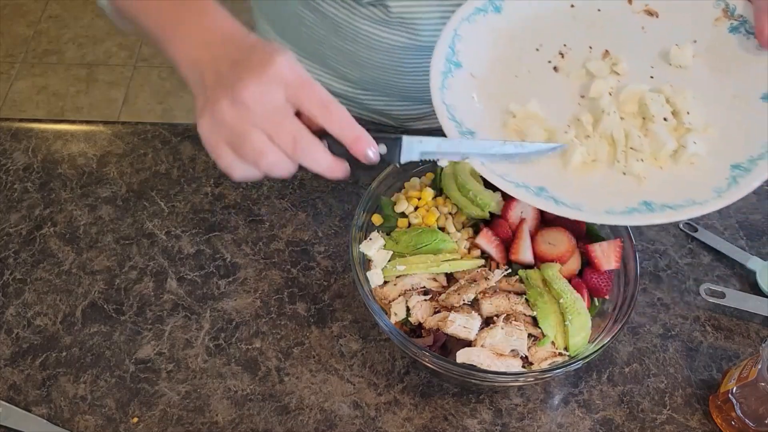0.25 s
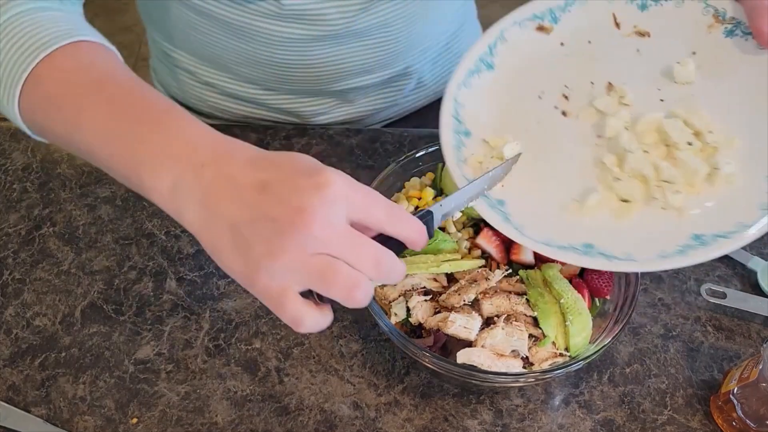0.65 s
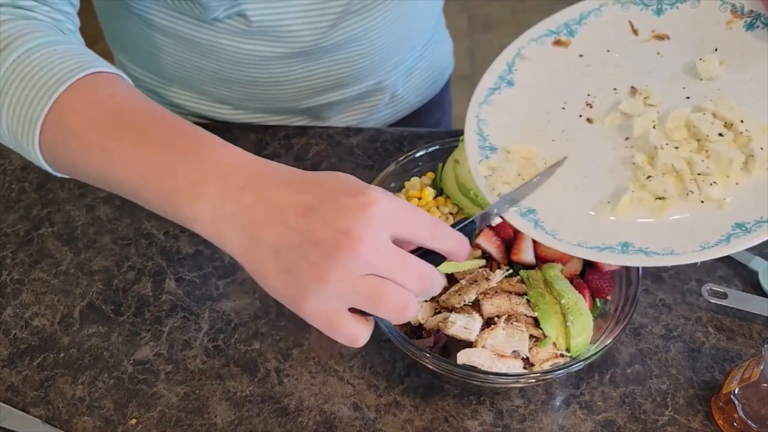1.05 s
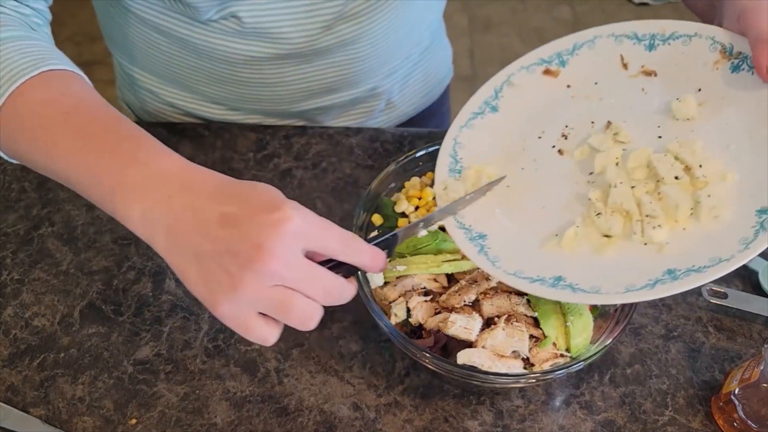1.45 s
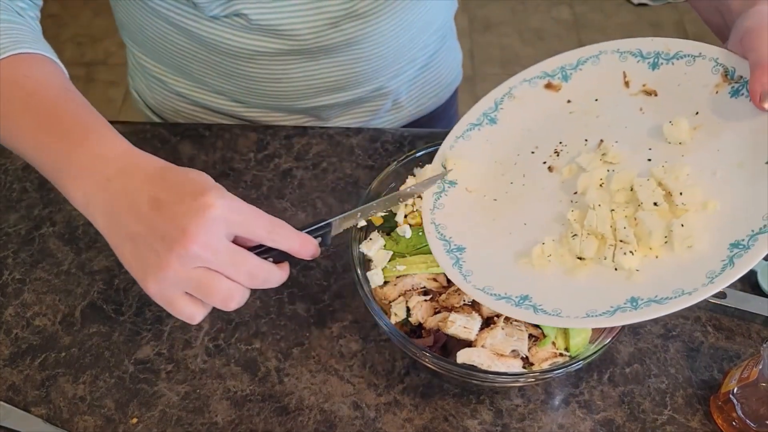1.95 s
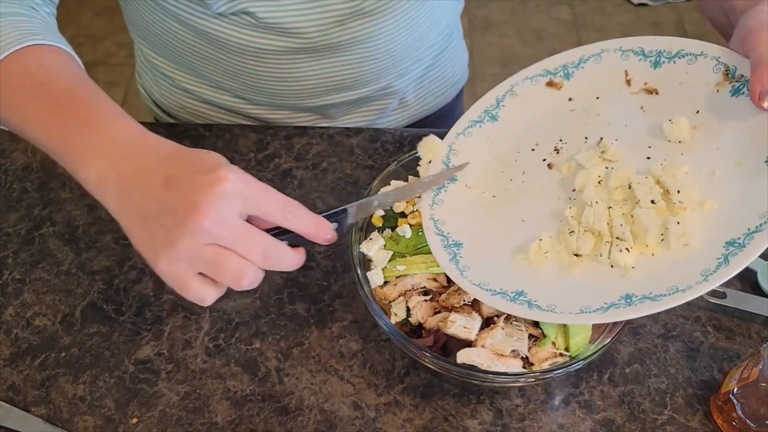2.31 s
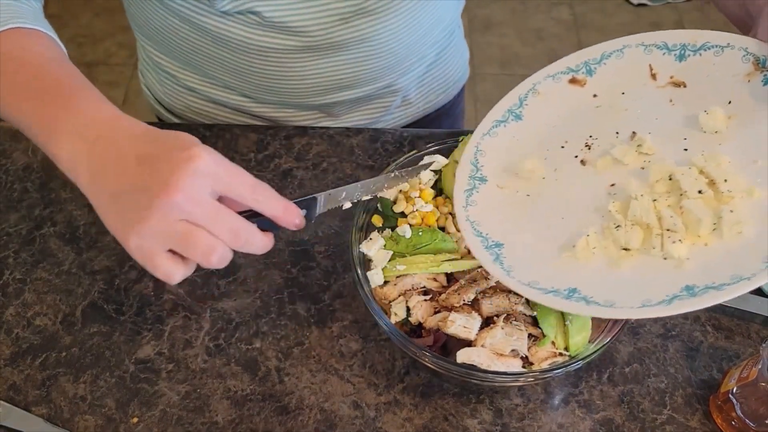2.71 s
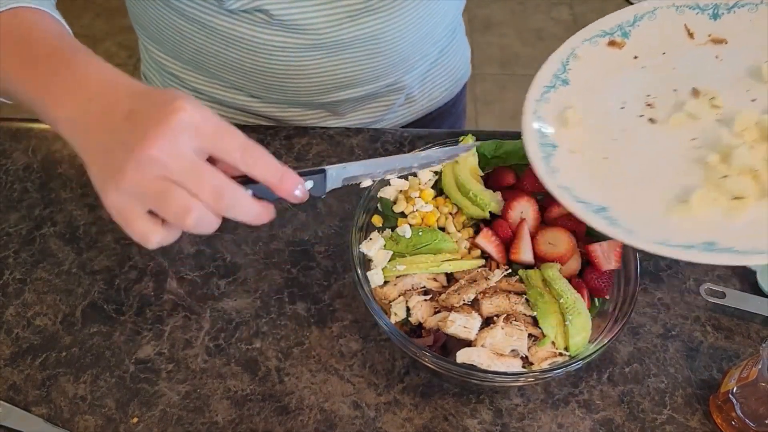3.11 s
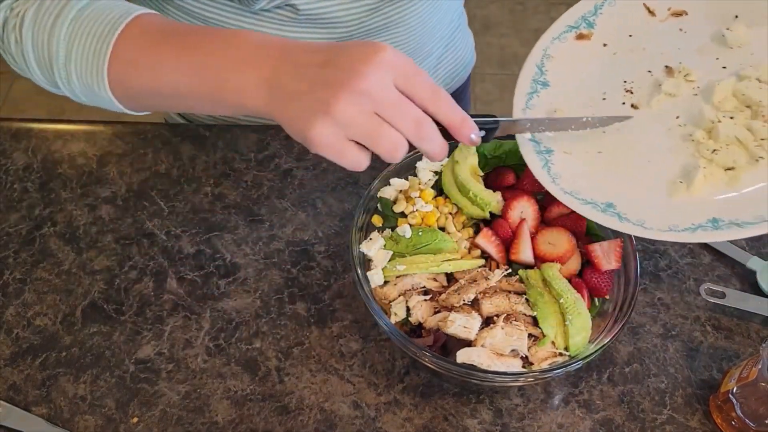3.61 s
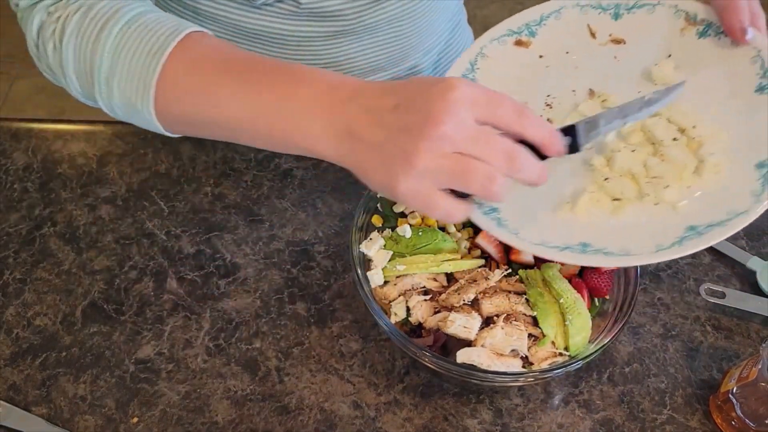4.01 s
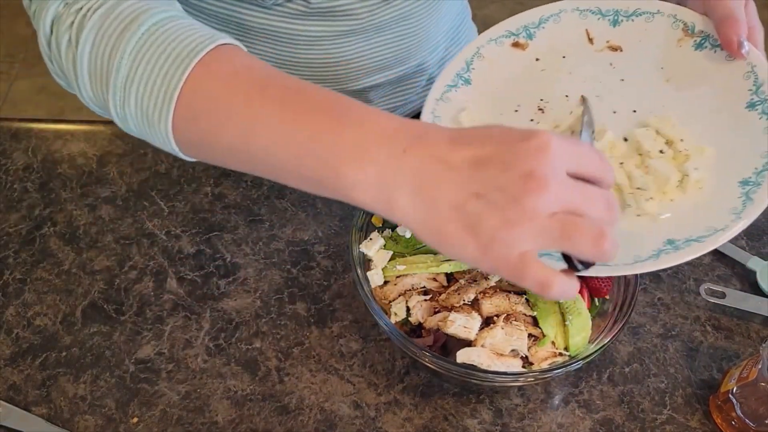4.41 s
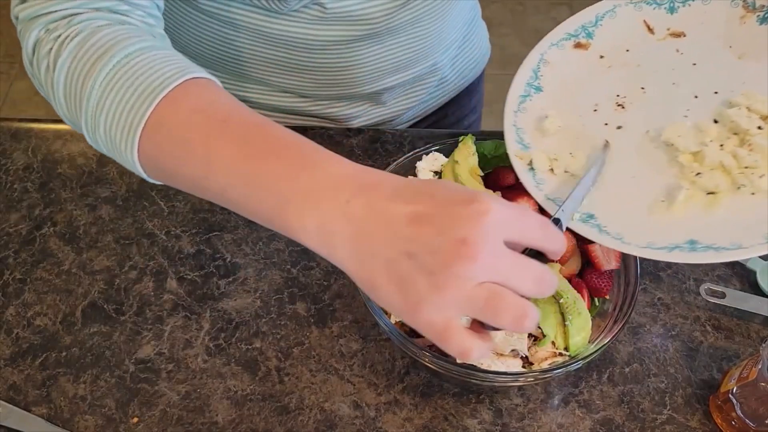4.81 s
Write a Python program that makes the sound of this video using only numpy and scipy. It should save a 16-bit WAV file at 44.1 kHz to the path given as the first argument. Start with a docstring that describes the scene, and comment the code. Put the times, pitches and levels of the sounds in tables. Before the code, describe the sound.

A knife clinks sharply on a ceramic plate, with short scrapes and a juddering run of snags, in a small kitchen over faint refrigerator hum.

```python
"""In a small, hard-walled kitchen, a table knife pushes crumbled cheese off a hand-held plate into a salad bowl.
The blade clinks on the ceramic, drags in tiny slips, snags and judders, and rings alone when it springs free:
each contact is a noise crack, a wash of overtones and decaying modes. Moist cheese squeaks as wavering sines,
crumbs drop as damped sines, a refrigerator hums in sines over filtered noise, and a noise tail is the room."""
import sys
import numpy as np
from scipy import signal
from scipy.fft import rfft, irfft, next_fast_len
from scipy.io import wavfile
from scipy.ndimage import uniform_filter1d

SR = 44100
rng = np.random.default_rng(int(sys.argv[2]) if len(sys.argv) > 2 else 0)


def transcribe(u):
    """Save the signal u as a 16-bit wav file named by the first command-line argument.

    u: samples, shape (n,) or (channels, n), limited to [-1, 1]; the rate is SR.
    q: integer samples, one column per channel.
    """
    v = np.clip(np.atleast_2d(u).T, -1, 1)
    q = np.round(v * 32767).astype(np.int16)
    wavfile.write(sys.argv[1], SR, q)


N = 222837
TIME = np.arange(N) / SR
RING = TIME[:SR // 3]  # time axis of one contact


def undb(db):
    """Decibels to gain."""
    return 10 ** (np.asarray(db) / 20)


def unit(x):
    """Scale to rms 1."""
    return x / np.sqrt(np.mean(x ** 2))


def on_log(hz, points):
    """Read (frequency [Hz], value) points on a log-frequency axis."""
    f, value = np.transpose(points)
    return np.interp(np.log(np.maximum(hz, 1)), np.log(f), value)


def colour(x, points):
    """Causal filter with the given (frequency [Hz], level [dB]) response, built from its cepstrum."""
    size = next_fast_len(x.shape[-1] + 4096, real=True)
    size += size % 2
    bins = np.arange(size // 2 + 1) * SR / size
    cepstrum = irfft(np.log(undb(on_log(bins, points))))
    # fold the cepstrum forward: minimum phase
    cepstrum[1:size // 2] *= 2
    cepstrum[size // 2 + 1:] = 0
    response = np.exp(rfft(cepstrum))
    return irfft(rfft(x, size) * response)[..., :x.shape[-1]]


def fade(t, t60):
    """Exponential decay, 60 dB down at t60."""
    return np.exp(-np.log(1000) * t / t60)


def pan(db):
    """Left and right gains for a level difference, left minus right."""
    return undb([[db / 2], [-db / 2]])


def add(out, s, x):
    """Mix x into out from time s."""
    i = int(s * SR)
    out[:, i:i + x.shape[-1]] += x[:, :N - i]


def walk(rate):
    """Slow random wandering with rms 1; rate is new values per second."""
    k = int(SR / rate)
    steps = np.repeat(rng.standard_normal(N // k + 1), k)
    return unit(uniform_filter1d(steps, k)[:N])


# refrigerator lines: (frequency [Hz], rms level before wavering [dB])
REFRIGERATOR_LINES = [(60, -71.5), (83, -67), (119.8, -66), (306.8, -74.5), (2966, -90), (3677, -93),
                      (6896, -103)]
# spectrum of the moving air: (frequency [Hz], relative level per Hz [dB])
AIR_SPECTRUM = [(15, -56), (25, -24), (43, -15.5), (123, -3), (145, -9), (242, -15), (270, -15.5),
                (301, -13.5), (326, -8.5), (575, -21), (677, -21), (2550, -43.5), (3080, -42.5),
                (3920, -48.5), (16000, -57.5)]
AIR_DB = -63
# the compressor's high lines wander more than its hum
WHINE_ABOVE_HZ, WHINE_DRIFT = 1000, 0.0046


def refrigerator(waver_db=3.35, drift=0.0012, pan_db=-2):
    """Mains hum and a thin, rough compressor whine over moving air; the bass is alike on both sides."""
    hum = np.zeros(N)
    for hz, db in REFRIGERATOR_LINES:
        line_drift = WHINE_DRIFT if hz > WHINE_ABOVE_HZ else drift
        level = np.sqrt(2) * undb(db + waver_db * walk(7.8))
        pitch = hz * (1 + line_drift * walk(120))
        hum += level * np.sin(2 * np.pi * np.cumsum(pitch) / SR)
    mid, side = unit(colour(rng.standard_normal((2, N)), AIR_SPECTRUM))
    side = colour(side, [(30, -7.5), (80, -9.5), (300, -4.0), (1000, 3)])
    air = undb(AIR_DB + .5 * walk(3.5)) * (mid + side * np.array([[1], [-1]]))
    return pan(pan_db) * (hum + air)


# spectrum of the contact crack, also tinting the wash: (frequency [Hz], level per Hz [dB])
CRACK_SPECTRUM = [(150, -34.5), (350, -3.5), (700, -0.5), (950, -4.5), (1400, -3.5), (1650, -7.5),
                  (2000, 0), (3200, 1.5), (3800, -3), (4600, -1), (8000, -2.5), (11000, -6), (14500, -7),
                  (16000, -19.5)]


def contact(modes, body_db, treble_db, spots=(), middle_db=0, crack_db=-1, crack_t60=0.019, dense_db=-2,
            dense_t60=0.13, cluster_hz=110, valley_db=-6, rise_s=0.0011, spread_s=.00016, split=.008):
    """One contact in stereo: a broad crack, clusters of short overtones and the clear modes."""
    hz, rest_db, t60 = np.transpose(modes)[:, :, None]
    # the spot sits on the antinodes of some modes
    db = rest_db + sum(spot_db * np.exp(-(np.log(hz / spot_hz) / .06) ** 2) for spot_hz, spot_db in spots)
    gain = undb(db) / np.sqrt(np.sum(undb(db) ** 2))

    # modes come in close pairs that beat
    pair_hz = split * rng.uniform(0.24, 1, hz.shape) * hz
    shape = fade(RING, t60) * np.cos(np.pi * pair_hz * RING)
    shape = gain * shape / np.sqrt(np.mean(shape ** 2, axis=1, keepdims=True) / 2)
    # each mode radiates its own way, so it reaches left and right at different times
    phase = rng.uniform(0, 2 * np.pi, hz.shape)
    lag = spread_s * rng.uniform(-0.78, 1, hz.shape)
    ring = np.array([np.sum(shape * np.sin(2 * np.pi * hz * (RING + side * lag) + phase), axis=0)
                     for side in (-1, 1)])

    # an oval, hand-damped shape splits each mode into a cluster
    bins = np.arange(50, SR / 2, 25)
    width = cluster_hz * np.sqrt(hz / 5000)
    peaks = undb(db + rest_db) * np.exp(-((bins - hz) / width) ** 2)
    clusters = undb(valley_db) ** 2 + np.sum(peaks, axis=0)
    wash_db = 10 * np.log10(clusters) + on_log(bins, CRACK_SPECTRUM)
    noise = rng.standard_normal((2, *ring.shape))
    wash = colour(noise[0] * fade(RING, dense_t60), np.c_[bins, wash_db])
    crack = colour(noise[1] * fade(RING, crack_t60), CRACK_SPECTRUM)

    sound = ring + undb(dense_db) * unit(wash) + undb(crack_db) * unit(crack)
    sound = sound * (1 - np.exp(-RING / rise_s))
    sound = sound / np.sqrt(np.mean(sound[:, :SR // 100] ** 2))  # rms 1 over the first 10 ms
    # the flat of the blade wakes the body, its edge the treble
    return colour(sound, [(750, body_db), (1250, middle_db), (2200, 0), (5600, 0.0079), (12500, treble_db)])


# modes of the ceramic plate: (frequency [Hz], relative energy [dB], free ring t60 [s])
PLATE_MODES = [(394.6, -3.5, 0.17), (587.7, 3.5, 0.023), (706.2, 3, 0.25), (754, 12.5, 0.097),
               (1150.7, -4, 0.23), (1316, 3.5, 0.12), (1441, -4, 0.064), (1942, 4, 0.029),
               (2237, -3, 0.078), (2715, -1, 0.061), (2901, -6, 0.11), (3330, 2, 0.35), (3405, 0.5, 0.1),
               (4076, -1, .18), (4424, 3, 0.19), (4820, 0, 0.18), (5020, -3, 0.11), (5622, 4.5, 0.08),
               (5860, -1, 0.16), (6340, 1, 0.11), (6600, -0.5, .16), (7110, 6, 0.1), (7940, 4.5, 0.063),
               (8640, 0.5, 0.13), (9230, 2.5, 0.098), (10300, 5, 0.13), (12100, -6, 0.1314),
               (12560, 0, 0.1), (13930, -9, .11), (15000, -7.5, 0.07)]
# knife strikes the plate and bounces once: (time [s], level [dB], body [dB], middle [dB], treble [dB],
# mode that the spot favours [Hz], its gain [dB], bounce after [s])
PLATE_CLINKS = [(0.2506, -42, 8.5, 15.5, -5, 2700, 26, .014), (0.4317, -28.5, 1.5, 9, -8.5, 406, 8, .006),
                (.489, -50.5, 5.5, 13.5, -11, 1280, 3, .003), (2.4388, -17.5, 1.5, -1, 6, 5590, 15, .005),
                (2.556, -32, -14, -22, -13, 8000, 9, .003), (2.57, -25.5, -4.5, -11, -2, 7000, -4, .009),
                (2.587, -31.5, -0.5, -2, 1.5, 4640, 18.5, .003),
                (4.1892, -32.5, 9.5, 7.5, 6.5, 4370, 16, .002), (5.033, -19, -3, -6.5, 7, 5540, 10.5, .002)]
BOUNCE_DB, BOUNCE_TREBLE_DB = -5, -0.5  # the second touch is weaker and duller


def clinks():
    """The edge hits the plate and touches it again a moment later."""
    out = np.zeros((2, N))
    for s, db, body_db, middle_db, treble_db, spot_hz, spot_db, bounce_s in PLATE_CLINKS:
        spot = [(spot_hz, spot_db)]
        strike = contact(PLATE_MODES, body_db, treble_db, spot, middle_db)
        bounce = contact(PLATE_MODES, body_db, treble_db + BOUNCE_TREBLE_DB, spot, middle_db)
        add(out, s, undb(db) * strike)
        add(out, s + bounce_s, undb(db + BOUNCE_DB) * bounce)
    return out


SLIPS_PER_S, SLIP_SCATTER_DB = 450, 4


def slipping(length, plate, fall_db=0):
    """Stick and slip: a run of uneven tiny blows shakes the plate, weakening by fall_db on the way."""
    happens = rng.random(len(RING)) < SLIPS_PER_S / SR
    scatter_db = SLIP_SCATTER_DB * rng.standard_normal(len(RING))
    progress = np.minimum(RING / length, 1)
    slips = happens * undb(scatter_db - fall_db * progress) * (RING < length)
    # energy follows length: a 15 ms run has that of one full blow
    slips = slips * np.sqrt(length / .015 / (np.sum(slips ** 2) + 1e-9))
    return signal.fftconvolve(plate, slips[None])


# blade drags evenly over the plate: (start [s], end [s], level [dB], body [dB], treble [dB])
BLADE_STROKES = [(0.252, 0.31, -44, 2, -12), (1.109, 1.17, -70.5, 8, -7), (1.51, 1.649, -75.5, 0.5, 2),
                 (2.46, 2.532, -37, 2, -6), (2.566, 2.599, -54, -9, 22), (4.208, 4.233, -39.5, -20, -22)]


def scrapes():
    """Even stick-slip drags; the plate answers differently in each half as the edge travels."""
    out = np.zeros((2, N))
    for start, end, db, body_db, treble_db in BLADE_STROKES:
        half = (end - start) / 2
        for s in (start, start + half):
            plate = contact(PLATE_MODES, body_db, treble_db, crack_db=6, dense_db=-6.5)
            add(out, s, undb(db) * slipping(half, plate))
    return out


# soft knocks of cheese and handling: (time [s], level [dB], pitch [Hz], t60 [s])
SOFT_KNOCKS = [(0.286, -55, 82, 0.22), (0.293, -46.5, 179.5, 0.18), (2.195, -53, 581.6, 0.071),
               (3.023, -37.5, 2545, 0.0025), (4.422, -43, 769, 0.04)]


def thuds(rise_s=0.00078, pan_db=-3):
    """Soft contacts wake only one damped resonance."""
    out = np.zeros((2, N))
    for s, db, hz, t60 in SOFT_KNOCKS:
        swing = np.sin(2 * np.pi * hz * RING) * fade(RING, t60) * (1 - np.exp(-RING / rise_s))
        add(out, s, undb(db) * pan(pan_db) * swing)
    return out


# modes of the steel blade, damped by the hand: (frequency [Hz], relative energy [dB], t60 [s])
BLADE_MODES = [(859, 2, 0.12), (902, 3, 0.035), (1388, -0.5, 0.081), (2156, -1.5, 0.15), (2570, 7.5, 0.039),
               (2870, -3, 0.056), (3526, 4.5, 0.044), (4690, 0.5, 0.05), (4820, 2, 0.06), (6150, -9, 0.044),
               (7100, -6, 0.059), (8040, -2.5, 0.096)]
# blade springs free and rings alone: (time [s], level [dB], body [dB], treble [dB])
BLADE_FLICKS = [(.5605, -35.5, -0.5, -6), (.58, -48.5, 4, 8.5), (1.0171, -46.5, 6.5, -8.5),
                (1.174, -65, 0, -19)]


def flicks():
    """The blade slips off the plate and rings with its own modes."""
    out = np.zeros((2, N))
    for s, db, body_db, treble_db in BLADE_FLICKS:
        add(out, s, undb(db) * contact(BLADE_MODES, body_db, treble_db))
    return out


# moist cheese squeaks faintly under the blade: (start [s], end [s], centre pitch [Hz], peak level [dB])
CHEESE_SQUEAKS = [(1.55, 1.61, 2260, -72), (1.997, 2.13, 1570, -73), (3.944, 3.98, 2573, -82.5),
                  (3.991, 4.061, 2730, -79.5)]


def squeaks(waver=0.029, pan_db=-2):
    """Fast, regular slipping gives a short, wavering tone."""
    out = np.zeros((2, N))
    for start, end, hz, db in CHEESE_SQUEAKS:
        swell = np.sin(np.pi * np.clip((TIME - start) / (end - start), 0, 1))
        pitch = hz * (1 + waver * walk(250))
        tone = np.sin(2 * np.pi * np.cumsum(pitch) / SR)
        out += undb(db) * pan(pan_db) * swell * tone
    return out


# blade snags and judders on its way to the rim: (time [s], judder length [s], level [dB],
# cushioning by cheese [0-1], favoured mode [Hz])
BLADE_SNAGS = [(1.645, 0.022, -54.5, 0.95, 1230), (1.671, 0.036, -47, 0.68, 1954),
               (1.703, 0.019, -42.5, 0.5, 1960), (1.749, 0.023, -42, 0.88, 2009),
               (1.787, 0.039, -39.5, 0.12, 5120), (1.839, 0.021, -44.5, 0, 2169),
               (1.878, .012, -46, .45, 5100)]
# colour of a snag with bare steel, then with cheese under it: (body [dB], treble [dB])
BARE_COLOUR = (-5.5, -21)
CUSHIONED_COLOUR = (8.1, -17.5)
PRESSED_RING = 0.91  # share of its ring time that the plate keeps under the pressing blade
SNAG_MODE_DB = 18  # boost of the favoured mode
JUDDER_DB, JUDDER_FALL_DB = -0.5, 5  # judder against the first bite; its fall from start to end


def snags():
    """The edge bites, then judders briefly; cheese under it turns a rasp into a hollow knock."""
    out = np.zeros((2, N))
    pressed = np.array(PLATE_MODES) * [1, 1, PRESSED_RING]
    for s, length, db, cushion, spot_hz in BLADE_SNAGS:
        body_db, treble_db = (1 - cushion) * np.array(BARE_COLOUR) + cushion * np.array(CUSHIONED_COLOUR)
        spot = [(spot_hz, SNAG_MODE_DB)]
        bite, judder = (contact(pressed, body_db, treble_db, spot, middle_db=3.4 * cushion,
                                crack_db=1.5, dense_db=0, dense_t60=0.094) for _ in range(2))
        add(out, s, undb(db) * bite)
        add(out, s, undb(db + JUDDER_DB) * slipping(length, judder, JUDDER_FALL_DB))
    return out


# decay of the kitchen by band: (frequency [Hz], t60 [s])
KITCHEN_DECAY = [(200, 0.56), (700, 0.51), (2500, 0.25), (5000, 0.37), (9000, 0.32), (15000, 0.15)]
ROOM_MIXING = 0.34  # share of the opposite side that the walls return


def kitchen(dry, wet_db=-5.5, delay_s=0.0029, build_s=0.002):
    """Cupboards and tiles return a dense noise tail that dies soonest at the very top."""
    t = TIME[:SR]
    hz = np.arange(SR // 2 + 1)
    noise = rfft(rng.standard_normal((2, SR)))
    centres = np.transpose(KITCHEN_DECAY)[0]
    tail = np.zeros((2, SR))
    # overlapping bands, each with its own decay
    for share, (_, t60) in zip(np.eye(len(centres)), KITCHEN_DECAY):
        band = irfft(noise * on_log(hz, np.c_[centres, share]))
        tail += band * fade(t, t60)
    build = 1 - np.exp(-np.maximum(t - delay_s, 0) / build_s)
    tail = unit(tail * build) / np.sqrt(SR)
    tail = colour(tail, [(300, -5.0), (750, -11.0), (1800, -1), (2700, 2.5), (5000, -4), (9000, -6.5),
                         (14000, -1.5)])
    mixed = dry + ROOM_MIXING * dry[::-1]
    return undb(wet_db) * signal.fftconvolve(mixed, tail, axes=1)[:, :N]


KNIFE_PAN_DB = -0.5  # left minus right, before the side colours in scene()


def scene():
    """Knife, plate and cheese in the kitchen, with the refrigerator behind."""
    knife = pan(KNIFE_PAN_DB) * (clinks() + scrapes() + flicks() + snags())
    left, right = knife + thuds() + squeaks()
    # knife, plate and cheese sound a little stronger on the right, more so above 1500 Hz
    left = colour(left, [(350, -1.8), (700, -1.5), (1500, -2.9)])
    right = colour(right, [(350, 0.0), (700, 0.3), (1500, 0)])
    dry = np.array([left, right])
    return dry + kitchen(dry) + refrigerator()


TOP_HZ = 15600


def record(dry):
    """A steep elliptic low-pass cuts the top."""
    low_pass = signal.ellip(8, .2, 70, TOP_HZ, fs=SR, output="sos")  # ripple, stopband [dB]
    return signal.sosfilt(low_pass, dry)


dry = scene()
out = record(dry)
transcribe(out)
```